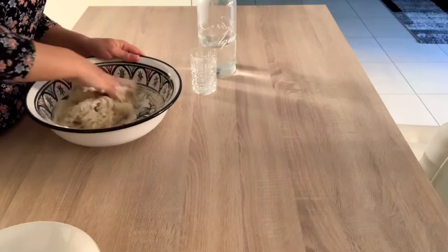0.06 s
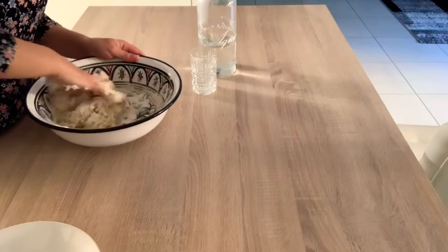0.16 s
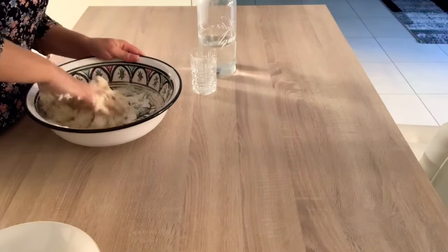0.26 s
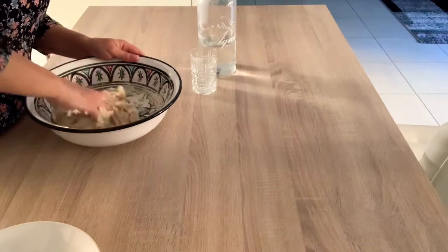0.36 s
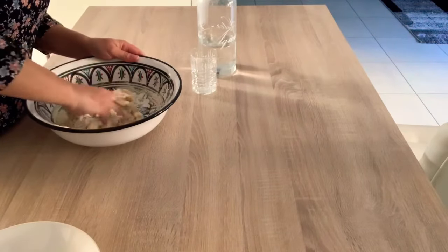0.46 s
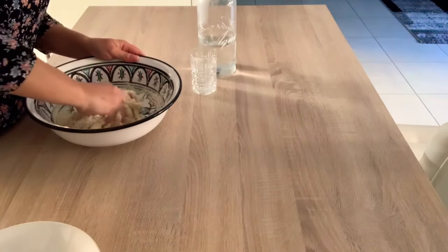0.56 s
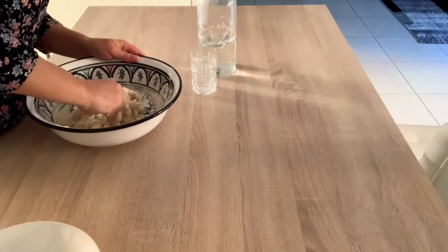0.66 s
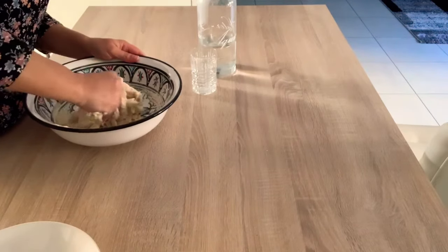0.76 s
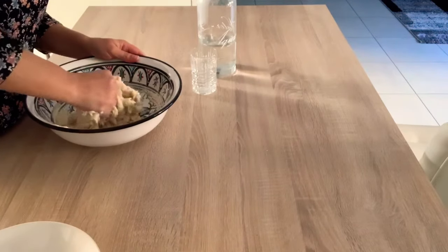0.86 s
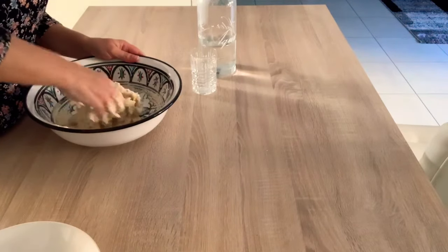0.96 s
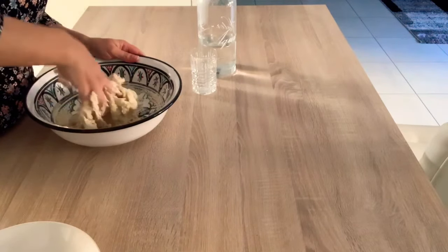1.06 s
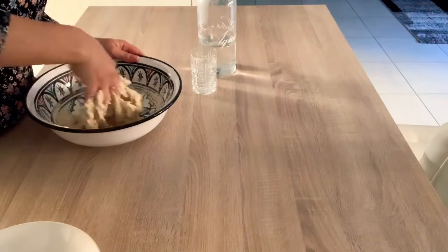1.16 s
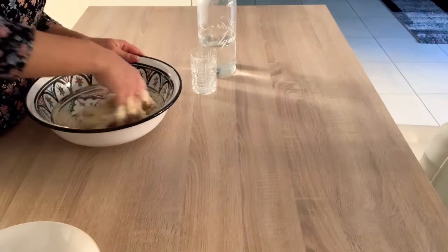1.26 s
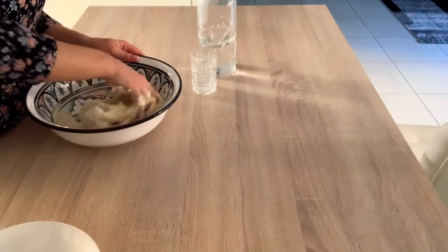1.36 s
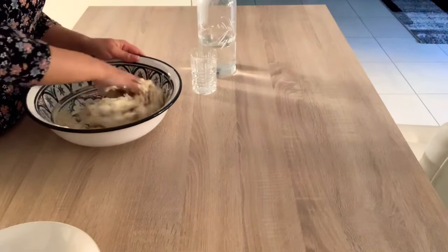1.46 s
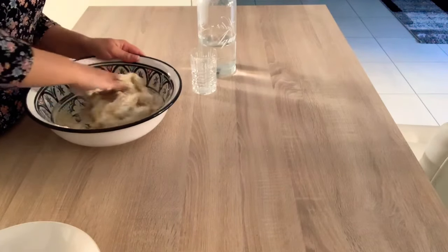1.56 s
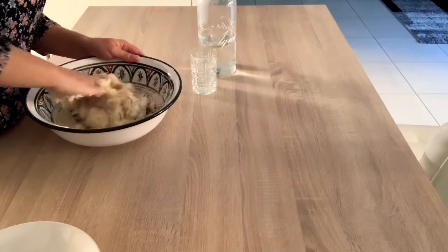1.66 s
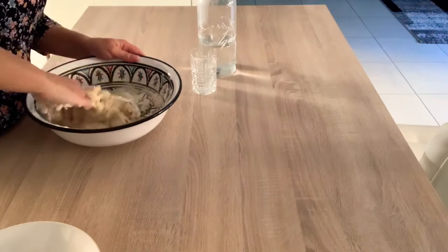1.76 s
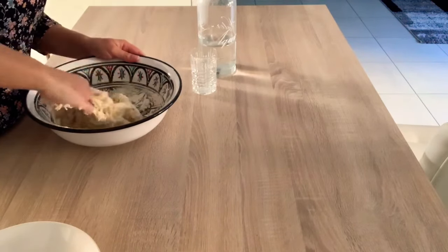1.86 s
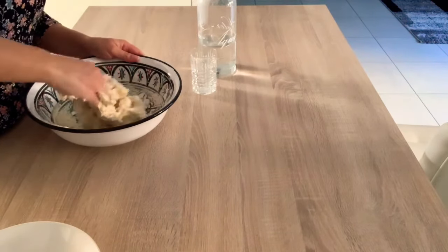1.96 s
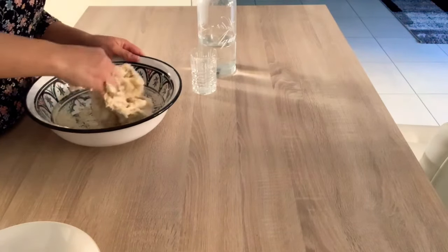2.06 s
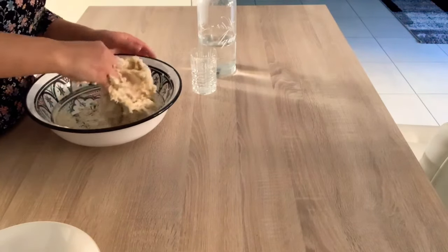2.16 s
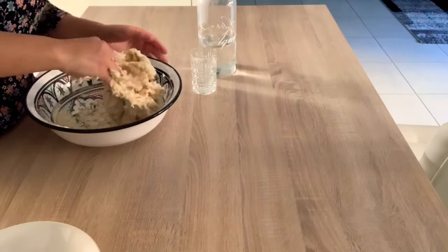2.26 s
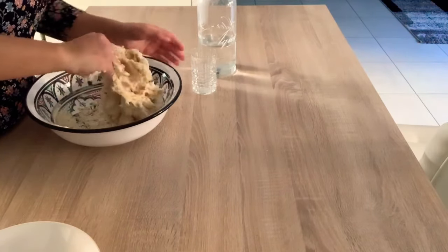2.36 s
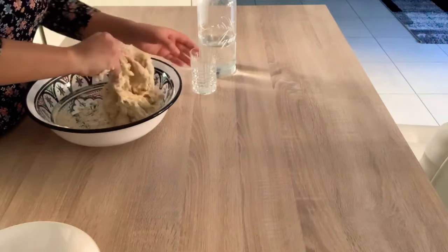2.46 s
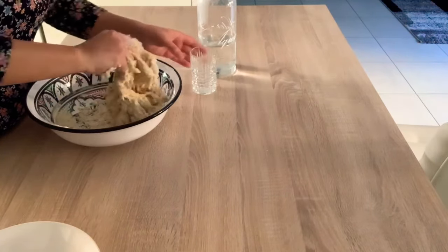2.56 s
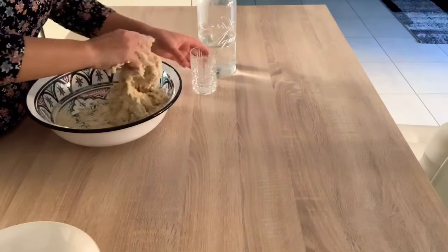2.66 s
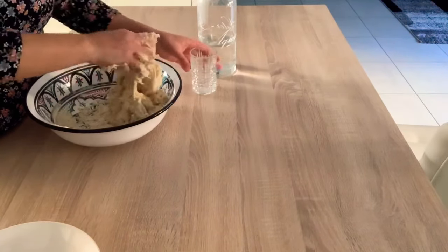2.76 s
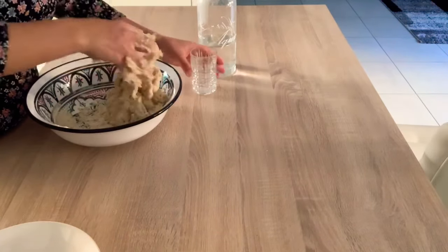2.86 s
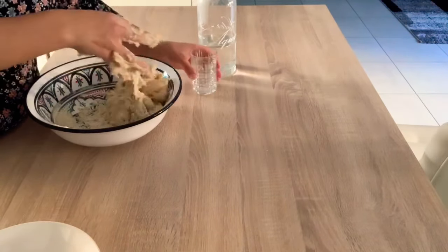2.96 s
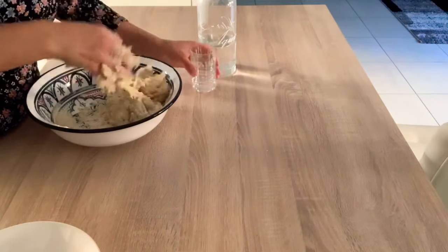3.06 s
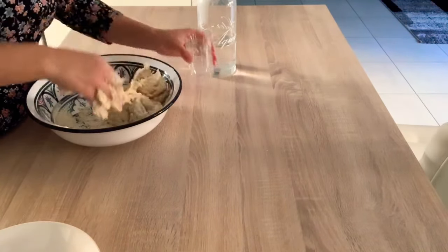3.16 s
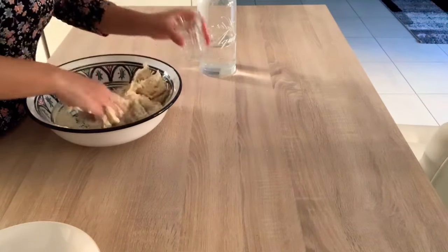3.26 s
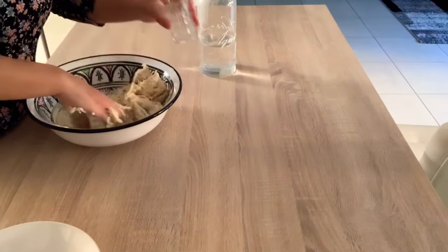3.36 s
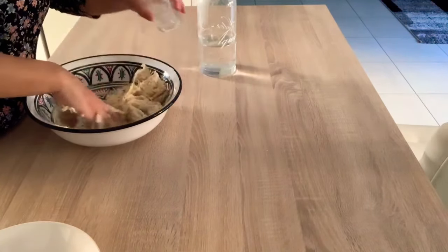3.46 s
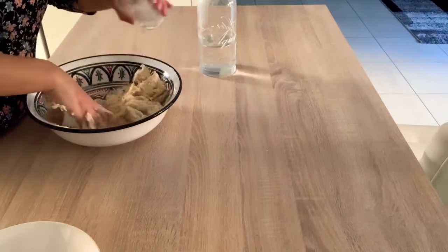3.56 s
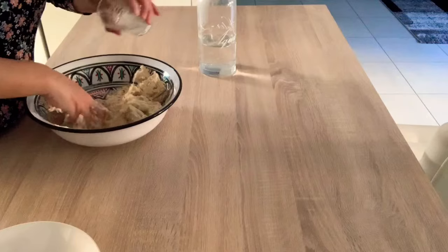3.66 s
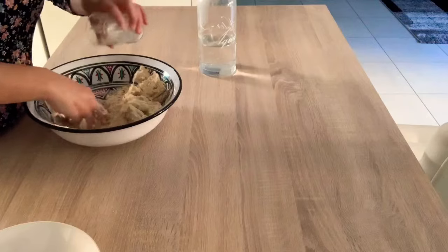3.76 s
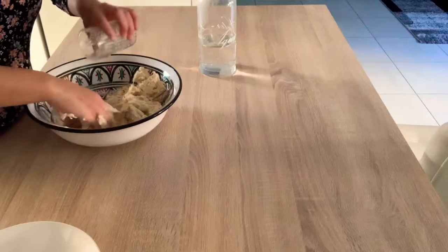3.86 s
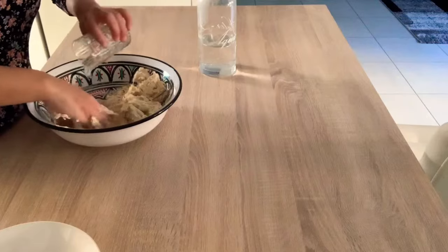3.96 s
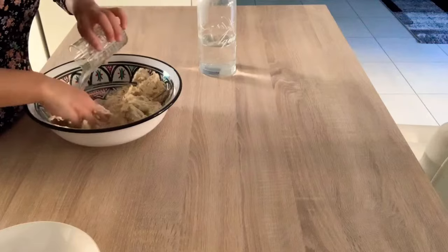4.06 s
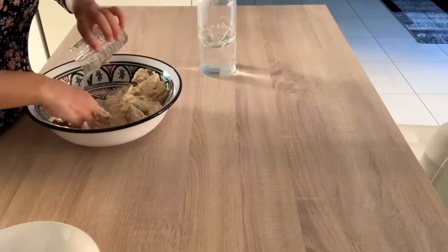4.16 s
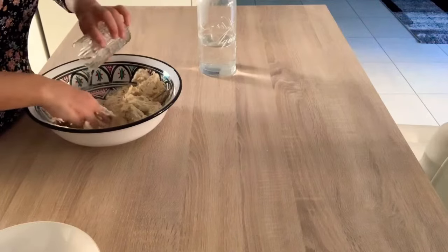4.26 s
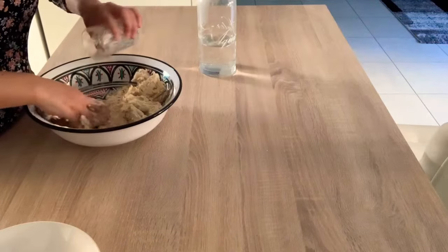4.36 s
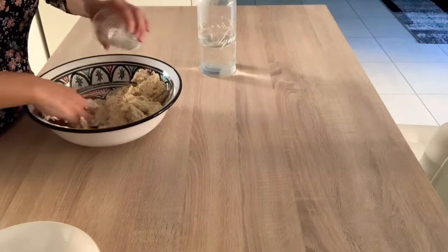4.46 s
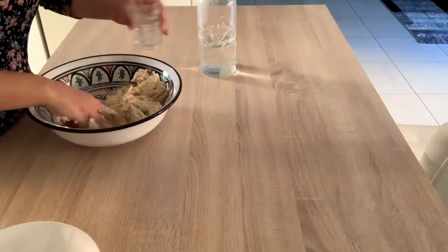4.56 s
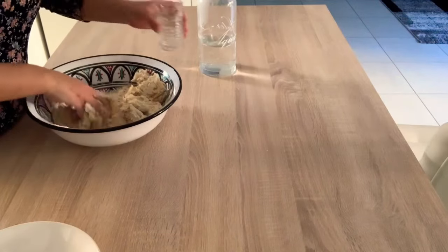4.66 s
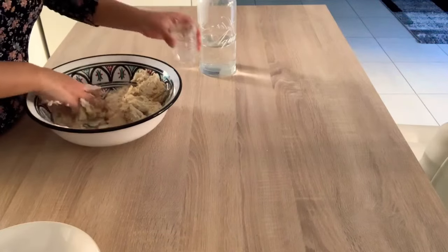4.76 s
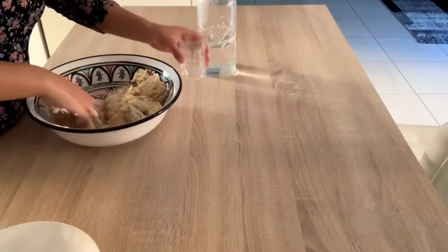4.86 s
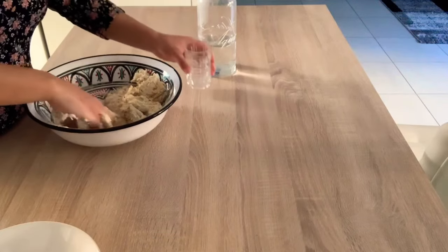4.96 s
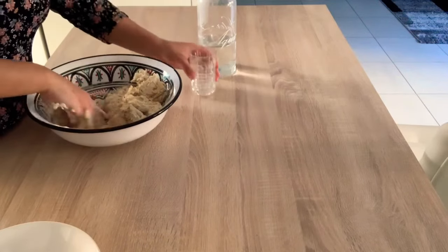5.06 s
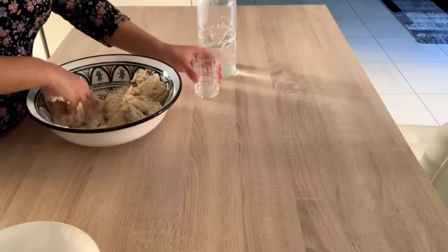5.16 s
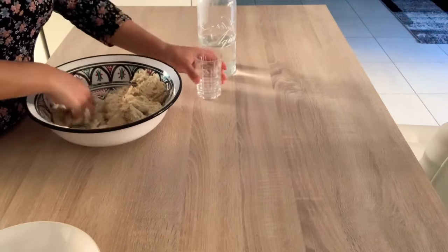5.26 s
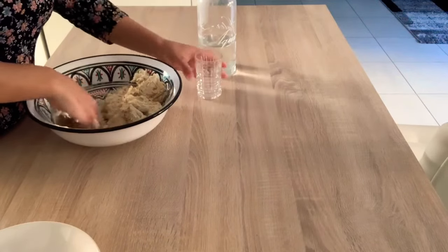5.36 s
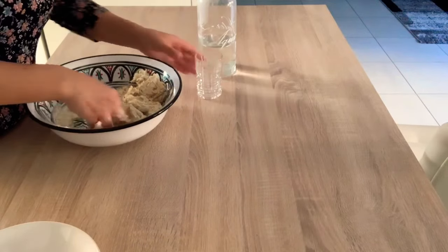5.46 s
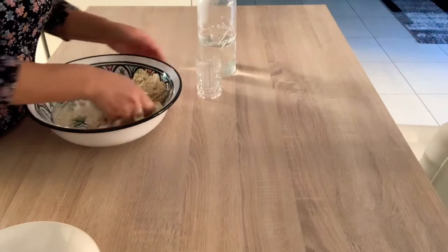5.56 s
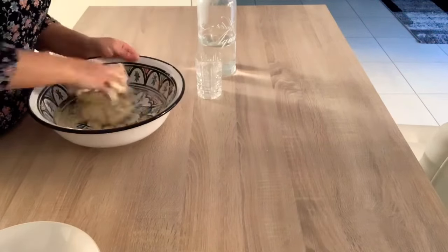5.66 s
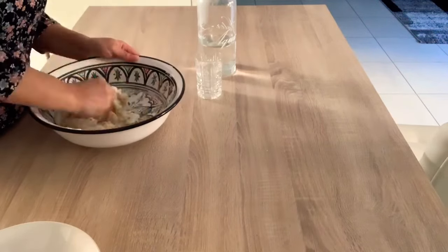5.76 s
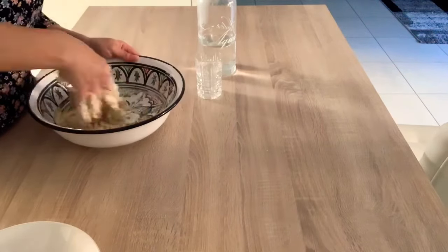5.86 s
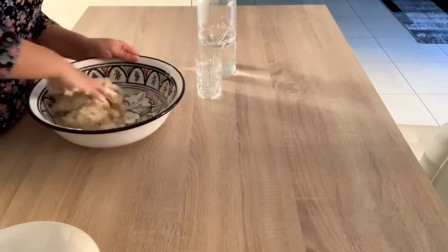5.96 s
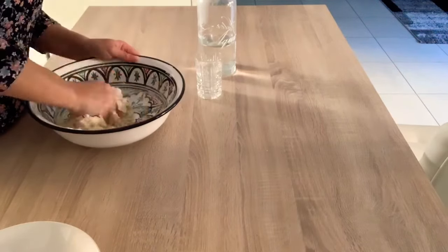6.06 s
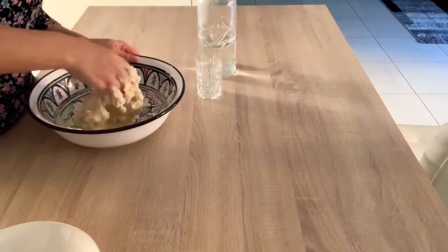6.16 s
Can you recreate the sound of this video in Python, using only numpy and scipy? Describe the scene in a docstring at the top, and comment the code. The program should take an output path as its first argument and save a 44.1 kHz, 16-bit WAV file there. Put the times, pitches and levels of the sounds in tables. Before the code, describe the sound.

In a quiet room, wet dough peels and crackles under a hand while pushes make the table boom dully. A bowl thump comes before one second, a softer one at three, beneath a barely audible bird twitter. After a tiny trickle of water, a glass knocks hard twice on wood. The bowl's foot slides and clatters lightly over a thinner background. The microphone is near the table.

```python
"""Wet dough squelches and fizzes in the air of a quiet room: it is kneaded by hand in a ceramic bowl on a table.
Pushes boom and rub as shaped noise; peeling is clustered snaps through resonances; pockets tick and ring.
The bowl thumps down twice and a glass gives two loud knocks, as decaying modes of the wooden table with a noise
wash. Wet skin squeaks and water trickles once as narrow noise; a bird twitters very faintly as gliding sines. At
last the bowl's foot slides and rattles, the background thins and faint held sines sound, perhaps the glass."""
import sys
import numpy as np
from scipy import signal
from scipy.fft import rfft, irfft, next_fast_len
from scipy.io import wavfile
from scipy.ndimage import uniform_filter1d, map_coordinates

SR = 44100
rng = np.random.default_rng(int(sys.argv[2]) if len(sys.argv) > 2 else 0)


def wav_record(signal):
    """Record a signal, one row per channel, as 16-bit PCM in the file named by sys.argv[1]."""
    frames = np.transpose(np.atleast_2d(signal))
    bounded = np.clip(frames, -1, 1)
    # unit amplitude maps onto the largest positive 16-bit level
    quanta = np.round(bounded * 32767).astype(np.int16)
    wavfile.write(sys.argv[1], SR, quanta)


N = 273420
TIME = np.arange(N) / SR
BAND_EDGES_HZ = np.geomspace(22, 17500, 30)


def from_db(db):
    """Level law: decibels to amplitude gain."""
    return 10 ** (np.asarray(db) / 20)


def rms_one(x):
    """Normalisation: scale to unit mean power."""
    return x / np.sqrt(np.mean(x ** 2) + 1e-20)


def at_hz(points, hz, axis=1):
    """Logarithmic pitch scale: read one column of a table along log frequency."""
    points = np.array(points, float)
    return np.interp(np.log(hz), np.log(points[:, 0]), points[:, axis])


def panned(x, left_db):
    """Level-difference stereo: tip the balance to the left."""
    return x * from_db(np.array([[left_db], [-left_db]]) / 2)


def add(out, s, sound):
    """Superposition: mix a sound in at a time."""
    start = int(s * SR)
    out[:, start:start + sound.shape[1]] += sound[:, :N - start]


def drift(rate):
    """Slow random modulation: smooth wavering of spread 1 through rate knots per second."""
    knots = rng.standard_normal(4096)
    return map_coordinates(knots, [TIME * rate], order=2, mode="wrap")


# likeness of the two channels: hz, correlation (-1 to 1)
LIKENESS = [(60, 0.99), (150, 0.8), (300, 0.42), (640, -0.44), (1400, 0.029), (3000, 0.1), (7000, -0.39),
            (10000, -0.93), (12000, 0.63), (14000, 0.92)]


def likeness(hz):
    """Interchannel coherence: correlation of left and right at a frequency."""
    return np.clip(at_hz(LIKENESS, hz), -.99, .99)


def noise_bands(size):
    """Band analysis: third-octave stereo noise with the tabulated correlation in each band."""
    run_in = SR // 4
    white = rng.standard_normal((2, 2, size + run_in))
    centres_hz = np.sqrt(BAND_EDGES_HZ[1:] * BAND_EDGES_HZ[:-1])
    for k, hz in enumerate(centres_hz):
        band = signal.butter(2, BAND_EDGES_HZ[k:k + 2], "band", fs=SR, output="sos")
        mid, side = signal.sosfilt(band, white[k % 2])[:, run_in:]
        alike = likeness(hz)
        yield hz, np.sqrt(1 + alike) * mid + np.sqrt(1 - alike) * side * [[1], [-1]]


def coloured(pair, spectrum):
    """Spectral shaping: two unrelated signals become stereo with the given spectrum; rms 1."""
    length = pair.shape[1]
    size = next_fast_len(length)
    hz = np.maximum(np.fft.rfftfreq(size, 1 / SR), 1)
    alike = likeness(hz)
    beyond = 1 / (1 + (hz / (2 * spectrum[-1][0])) ** 2)   # fall above the last tabulated frequency
    gain = from_db(at_hz(spectrum, hz)) * beyond * np.sqrt([1 + alike, 1 - alike])
    mid, side = irfft(rfft(pair, size) * gain, size)[:, :length]
    return rms_one(np.array([mid + side, mid - side]))


def noise(spectrum):
    """Stationary random sound: steady stereo noise."""
    return coloured(rng.standard_normal((2, N)), spectrum)


def evened(x, span_s):
    """Envelope flattening: take out slow swells, so that the hand alone shapes the sound."""
    power = uniform_filter1d(np.mean(x ** 2, axis=0), int(span_s * SR))
    return x / np.sqrt(power + 1e-9)


def swells(events, rise, roundness):
    """Amplitude envelope: gain rises to a peak and dies away, halved at the ends of its length.

    rise is the share of the length spent rising; roundness runs from 1 (pointed) to 2 (bell-shaped).
    Overlapping movements add in power; there is one curve per level column."""
    power = 0
    for peak_s, length_s, *levels_db in events:
        away = np.maximum((peak_s - TIME) / rise, (TIME - peak_s) / (1 - rise)) / length_s
        bump = .5 ** np.minimum(away ** roundness, 20)
        power = power + np.outer(from_db(levels_db), bump) ** 2
    return np.sqrt(power)


def with_fingers(gain, fingers_db):
    """Power addition: the restless fingers waver in level beneath the larger movements."""
    waver_db = 2.5 * drift(18)
    return np.hypot(gain, from_db(fingers_db + waver_db))


def crackle(spectrum, per_s, spread_db, clump_db, wet_db, patchy_db):
    """Random impulses and resonance: clumped snaps ring in hollows that open and close; the room smears them."""
    chance = per_s * from_db(clump_db * drift(60)) / SR
    born = rng.random((2, N)) < chance
    sizes = from_db(spread_db * np.minimum(rng.exponential(1, (2, N)), 4))
    snaps = born * rng.choice([-1, 1], (2, N)) * sizes
    echo = rng.standard_normal((2, SR // 3)) * from_db(-60 * TIME[:SR // 3] / 0.1)
    smeared = signal.fftconvolve(snaps, echo, axes=1)[:, :N]
    grains = rms_one(snaps) + from_db(wet_db) * rms_one(smeared)
    hollows = 0
    for k, hz in enumerate(np.geomspace(400, 19500, 30)):
        opening = (-1) ** k * from_db(patchy_db * drift(22))
        hollows = hollows + opening * signal.lfilter(*signal.iirpeak(hz, 11, fs=SR), grains)
    return evened(coloured(hollows, spectrum), span_s=0.13)


# spectrum of the quiet room's air: hz, density_db per Hz (relative)
AIR = [(15, -28.5), (25, -16), (65, 2), (130, -5.5), (300, -16), (700, -16), (1300, -30), (3000, -33),
       (6000, -38), (15000, -51.5)]


def quiet_air():
    """Stationary noise: the steady, deep background."""
    return panned(from_db(-61) * noise(AIR), left_db=0.5)


# wet dough peels from fingers and glaze: peak_s, length_s, squelch_db, fizz_db
PEELS = [(0.01, .11, -60, -77), (0.15, 0.085, -62.5, -74), (0.23, 0.045, -76, -65.5),
         (0.33, 0.15, -67, -78), (0.52, 0.13, -67, -75), (1.0, 0.058, -57.5, -61.5),
         (1.04, 0.059, -67, -59.5), (1.53, 0.14, -59, -73.5), (1.81, 0.1, -72.5, -77),
         (2.14, 0.12, -76, -78.5), (2.67, 0.13, -71, -87), (3.02, 0.25, -77, -97),
         (3.49, 0.098, -67, -72.5), (3.92, 0.043, -72.5, -82), (4.16, 0.036, -69.5, -74),
         (4.3, 0.051, -63, -83), (4.38, 0.13, -64, -75), (4.55, 0.086, -67, -82), (4.74, 0.11, -60, -72.5),
         (4.9, 0.1, -62, -74), (4.97, 0.054, -61, -83), (5.09, 0.22, -63.5, -81), (5.23, 0.032, -69, -70),
         (5.36, .07, -58.5, -58.5), (5.785, 0.013, -71, -65.5), (5.88, .03, -72.5, -73),
         (5.93, 0.082, -72, -83), (6.02, .07, -75, -68)]
# spectra of the squelch and of the fine fizz: hz, density_db per Hz (relative)
SQUELCH = [(500, -18), (1100, -7), (1900, -7), (2500, 0), (3600, 0), (4400, -3), (5600, -1), (7200, -7),
           (10000, -19), (15000, -36)]
FIZZ = [(3000, -40), (8000, -16), (11000, -1), (14000, 0), (15500, -3), (17000, -20)]


def sticky_dough():
    """Granular emission: wet dough squelches and fizzes in countless snaps as it peels away."""
    tearing, fizzing = swells(PEELS, rise=0.47, roundness=1.65)
    wet_snaps = crackle(SQUELCH, per_s=3000, spread_db=2.5, clump_db=4.0, wet_db=-5.5, patchy_db=2.0)
    fine_snaps = crackle(FIZZ, per_s=2800, spread_db=4.5, clump_db=4.5, wet_db=3.0, patchy_db=1.5)
    squelch = with_fingers(tearing, fingers_db=-85) * wet_snaps
    fizz = with_fingers(fizzing, fingers_db=-82) * fine_snaps
    return panned(squelch + fizz, left_db=-0.2)


# air pockets bursting in the dough: start_s, level_db, pitch_hz
POPS = [(0.048, -59, 2740), (0.221, -54, 12700), (0.549, -61.5, 6100), (0.637, -60.5, 13400),
        (1.031, -55.5, 13600), (3.525, -48, 3360), (4.299, -57.5, 5060), (4.418, -60.5, 4200),
        (4.875, -47, 3660), (5.218, -54, 14000), (5.241, -58, 13800), (5.334, -45.5, 12800),
        (5.438, -54, 3520)]
# spectrum of the tick: hz, density_db per Hz (relative)
POP = [(500, -11), (1800, 2.5), (3200, -17), (5000, 2.5), (9000, -0.5), (15000, -5.5)]


def air_pockets(snap_s, tail_db, tail_s, ring_db, ring_s):
    """Cavity resonance: a bursting pocket gives a sharp tick, a brief ring and a faint, duller tail."""
    out, t = np.zeros((2, N)), TIME[:SR // 4]
    for start_s, level_db, pitch_hz in POPS:
        tick = np.exp(-t / snap_s) * coloured(rng.standard_normal((2, len(t))), POP)
        tail_noise = coloured(rng.standard_normal((2, len(t))), SQUELCH)
        tail = from_db(tail_db) * np.exp(-t / tail_s) * tail_noise
        ring = from_db(ring_db) * np.exp(-t / ring_s) * np.sin(2 * np.pi * pitch_hz * t)
        add(out, start_s, from_db(level_db) * (tick + ring + tail))
    return out


# the lump of dough shifts in the bowl: peak_s, length_s, thud_db, rub_db
SHOVES = [(0.085, 0.054, -55, -59.5), (0.5, 0.063, -45.5, -56.5), (0.785, 0.087, -49, -54),
          (2.2, 0.15, -54, -65), (2.96, 0.027, -54.5, -53.5), (3.01, 0.035, -56, -50),
          (3.2, 0.1, -56.5, -60.5), (3.46, 0.091, -55.5, -50.5), (3.65, .14, -57, -71),
          (4.57, 0.28, -60, -65), (4.78, 0.19, -54, -63.5), (5.06, 0.36, -60, -64)]
# the arm leans on the bowl and the table booms: peak_s, length_s, level_db
PUSHES = [(0.23, 0.22, -48), (0.53, 0.12, -47), (1.06, 0.33, -47.5), (1.38, 0.4, -55.5),
          (1.59, 0.066, -47.5), (1.88, 0.21, -45.5), (2.18, 0.11, -45), (2.28, 0.12, -52.5),
          (2.46, 0.089, -55), (2.74, 0.21, -54.5), (3.07, 0.19, -53.5), (3.27, 0.12, -45.5),
          (3.47, 0.21, -50.5), (3.99, 0.26, -50), (4.29, 0.12, -46), (4.41, .07, -49.5), (4.6, 0.16, -53),
          (4.85, 0.25, -51.5), (5.15, 0.12, -47.5), (5.46, .06, -53.5)]
# spectra of the table's boom, the dough's thud and its rubbing: hz, density_db per Hz (relative)
BOOM = [(15, -50), (25, -33.5), (45, -8.5), (57, -11), (69, 11.5), (85, -10.5), (120, -38), (250, -67.5)]
THUD = [(60, -5.5), (100, -6.5), (130, 7), (190, -2.5), (270, -19.5), (600, -55.5)]
RUB = [(130, -14.5), (230, 0), (340, 6.5), (500, -6.5), (750, -10.5), (1200, -34.5), (2200, -30.5),
       (5000, -65.5)]


def pushing():
    """Forced vibration and friction: pushes make the table boom while the dough thuds and rubs in the bowl."""
    lean, = swells(PUSHES, rise=0.49, roundness=1.7)
    weight, friction = swells(SHOVES, rise=0.38, roundness=1.7)
    # every push also thuds and rubs, at these levels relative to its boom
    weight = np.hypot(weight, lean * from_db(-18.5))
    friction = np.hypot(friction, lean * from_db(-22))
    boom = lean * evened(noise(BOOM), span_s=0.13)
    thud = with_fingers(weight, fingers_db=-61) * evened(noise(THUD), span_s=0.027)
    rub = with_fingers(friction, fingers_db=-67.5) * evened(noise(RUB), span_s=0.046)
    return panned(boom + thud + rub, left_db=3.5)


def strike(blow, modes, wash, wash_db, crack_db, crack_s, build_cycles, travel_s, scatter_db, skew, steepness):
    """Modal impact: modes swell and ring, a short crack leads, and a dense wash follows."""
    _, level_db, bass_db, middle_db, tilt_db, contact_hz, ring, left_db = blow
    t = TIME[:SR * 3 // 4]

    def drive(hz):
        """Excitation spectrum: strength and age of the motion at one pitch."""
        weight_db = bass_db / (1 + (hz / 240) ** 4)
        # the spot that is hit favours or starves the middle modes
        spot_db = middle_db * np.exp(-np.log2(hz / 1000) ** 2)
        tilt = from_db(tilt_db * np.log2(max(hz / 400, 1)))
        hardness = tilt / np.sqrt(1 + (hz / contact_hz) ** steepness)
        # low bending waves cross the board more slowly
        age = np.maximum(t - travel_s / (1 + (hz / 700) ** 2), 0)
        build_up = 1 - np.exp(-age * hz / build_cycles)
        return from_db(level_db + weight_db + spot_db) * hardness * build_up, age

    body, tail = 0, 0
    for k, (hz, mode_db, t60, side_db) in enumerate(modes):
        force, age = drive(hz)
        # the less alike the channels are at this pitch, the further apart their phases
        phase_gap = np.arccos(np.clip(at_hz(LIKENESS, hz), -1, 1))
        apart = skew * (-1) ** (k // 2) * phase_gap * np.array([[.5], [-.5]])
        wave = np.sin(2 * np.pi * hz * age + apart + rng.uniform(0, 2 * np.pi))
        decay_db = mode_db + rng.normal(0, scatter_db) - 60 * age / (t60 * ring)
        body = body + panned(force * from_db(decay_db) * wave, side_db)
    for hz, band in noise_bands(len(t)):
        force, age = drive(hz)
        decay = from_db(-60 * age / (at_hz(wash, hz, axis=2) * ring))
        crack = from_db(crack_db) * np.exp(-age / crack_s) * hz / (hz + 1200)
        tail = tail + band * force * from_db(at_hz(wash, hz) + wash_db) * (decay + crack)
    return panned(body + tail, left_db)


# blows on the table top: start_s, level_db, bass_db, middle_db, treble_tilt_db per octave,
# contact_cutoff_hz, ring_factor (multiplies every t60_s), left_right_db
BLOWS = [(0.831, -25, 9.5, -12.5, -1.5, 2800, 0.82, 0.5), (3.032, -32.5, -8.5, 3, -17, 980, 0.88, 4.5),
         (5.137, -18, 3.5, 4, 0.5, 12000, 1, 1), (5.288, -13.5, -6.5, -1.5, 0.0, 12100, 0.96, 2.0)]
# modes of the table top with the bowl on it: pitch_hz, level_db, t60_s (at ring factor 1), left_right_db
TABLE_MODES = [(72.3, -28.5, 0.45, 8), (101.8, -10.5, 0.27, 5), (125.3, -7, 0.44, 0),
               (140.7, -11.5, 0.36, 5), (179.4, -9.5, .35, -7), (253, -4, 0.28, -0.5),
               (285.5, -5.5, 0.26, 4.5), (305, -7, .22, -9.5), (351.2, 2.5, 0.4, 7), (396, -2, 0.32, 9),
               (411.4, 0, 0.26, -8.5), (451.5, -10, 0.43, -4.5), (447, -5.5, 0.15, -2.5),
               (508, -7.5, 0.29, -9), (565, -11.5, 0.22, -8), (611, -20, 0.45, 5), (658, -3.5, 0.27, 0),
               (742, 0.5, 0.21, -6.5), (773, -10.5, 0.11, -13.5), (835, -10, 0.18, 11),
               (912, -7.5, 0.11, 10.5), (992, -23, 0.46, 15.5), (1119, -25.5, 0.36, 14),
               (1194, -19, 0.36, -4.5), (1407, -20.5, 0.26, 5), (1520, -33, 0.33, -3.5),
               (1756, -14.5, 0.11, -6.5), (2140, -36, .2, -6.5), (2970, -40.5, .16, -12.5)]
# the dense wash that follows a blow: hz, density_db per Hz (relative), t60_s (at ring factor 1)
TABLE_WASH = [(40, -13, 0.63), (110, -3, 0.58), (214, -11.5, 0.72), (406, 1, 0.53), (573, -10.5, 0.83),
              (800, -6, 0.61), (1470, -21, 0.36), (2520, -29, 0.33), (4770, -42, 0.46), (8700, -49, 0.41),
              (15000, -57, 0.59)]


def table_knocks():
    """Plate vibration: the bowl, then the glass, excites the modes of the table top."""
    out = np.zeros((2, N))
    for blow in BLOWS:
        knock = strike(blow, TABLE_MODES, TABLE_WASH, wash_db=10.5, crack_db=9, crack_s=0.0061,
                       build_cycles=0.96, travel_s=0.003, scatter_db=1.0, skew=0.58, steepness=11)
        add(out, blow[0], knock)
    return out


# faint short rough tones: wet skin squeaks, and water trickles from the glass at 4.27 s:
# centre_s, pitch_hz, length_s, level_db
ROUGH_TONES = [(0.958, 5500, 0.045, -67), (1.002, 2480, 0.065, -59.5), (2.087, 4300, 0.089, -75),
               (2.087, 2370, 0.097, -73), (2.158, 4300, 0.046, -70), (2.161, 3360, 0.077, -73),
               (2.188, 1540, 0.11, -72.5), (2.612, 4530, 0.089, -74), (3.461, 3360, .08, -65),
               (3.47, 4300, 0.072, -75), (4.27, 5600, 0.07, -64.5), (4.546, 3600, 0.14, -69)]


def squeaks_and_trickle(width_hz):
    """Narrow-band noise: short rough tones for squeaking wet skin and one trickle of water."""
    out = np.zeros((2, N))
    for centre_s, pitch_hz, length_s, level_db in ROUGH_TONES:
        size = int(length_s * SR)
        edges_hz = [pitch_hz - width_hz / 2, pitch_hz + width_hz / 2]
        band = signal.butter(2, edges_hz, "band", fs=SR, output="sos")
        tone = rms_one(signal.sosfilt(band, rng.standard_normal((2, SR // 4)))[:, -size:])
        add(out, centre_s - length_s / 2, from_db(level_db) * np.hanning(size) * tone)
    return out


def add_note(out, centre_s, pitch_hz, length_s, level_db, fall):
    """Frequency modulation: a sine swells, fades and falls by a share of its pitch."""
    t = TIME[:int(length_s * SR)]
    glide_hz = pitch_hz * (1 + fall * (.5 - t / length_s))
    note = np.hanning(len(t)) * np.sin(2 * np.pi * np.cumsum(glide_hz) / SR)
    add(out, centre_s - length_s / 2, from_db(level_db) * np.array([note, note]))


def echoed(x, echo_db):
    """Reverberation: convolution with decaying noise blurs a sound."""
    echo = rng.standard_normal((2, SR // 3)) * from_db(-60 * TIME[:SR // 3] / 0.25)
    blurred = signal.fftconvolve(x, echo / np.linalg.norm(echo[0]), axes=1)[:, :N]
    return x + from_db(echo_db) * blurred


# a far bird's quick series of chirps: centre_s, pitch_hz, level_db
CHIRPS = [(2.68, 4780, -68), (2.777, 4910, -74), (2.83, 4880, -77), (2.895, 4860, -71), (2.948, 4890, -66),
          (3.01, 4930, -67), (3.064, 4980, -68), (3.13, 4850, -68.5)]


def bird(echo_db):
    """Frequency modulation and reverberation: short falling chirps, blurred by distance."""
    out = np.zeros((2, N))
    for centre_s, pitch_hz, level_db in CHIRPS:
        fall = .13 * (1 + 0.44 * rng.standard_normal())   # share of its pitch
        add_note(out, centre_s, pitch_hz, 0.024, level_db, fall)
    return echoed(out, echo_db)


# the bowl slides before it taps, as points of a level curve: time_s, level_db
SLIDE = [(5.50, -51), (5.515, -56), (5.548, -57.5), (5.558, -44), (5.585, -37), (5.60, -66), (5.64, -90)]
# spectrum of the sliding: hz, density_db per Hz (relative)
SCRAPE = [(50, -60), (120, -32), (300, -13), (520, -0.5), (900, 0), (1450, -1.5), (2200, -13), (3400, -18),
          (5000, -28), (8000, -21.5), (15000, -26)]
# the bowl's foot taps the table: start_s, level_db, bass_db, middle_db, treble_tilt_db per octave,
# contact_cutoff_hz, ring_factor (multiplies every t60_s), left_right_db
RATTLES = [(5.511, -62.5, -1, 0, 8, 5030, 0.43, 2), (5.588, -26.5, 0, 0, 1, 8050, 0.9, 1.2),
           (5.655, -31.5, 2.5, 1, -2, 3970, 0.7, 2.5), (5.872, -39, 14.5, 0.21, -8, 2200, 1.03, 2.2),
           (6.016, -39.5, 7, 0.35, -4, 2280, 0.82, 3.2), (6.096, -40, -7, 0.1, -5, 2180, 0.68, 3),
           (6.145, -35, -15, 0.27, -5, 2050, 0.66, 3.5)]
# modes of the bowl held by its rim: pitch_hz, level_db, t60_s (at ring factor 1), left_right_db
BOWL_MODES = [(281, -15.5, 0.135, 0), (389, -11.5, 0.16, -1.5), (505.6, 3, 0.1, 0),
              (590, -12.5, 0.071, 1.5), (760, -9, 0.087, 4.5), (1153, 5, 0.015, 7.5),
              (1407, 1.5, 0.051, 3.5), (1604, 2, 0.022, -8), (1660, -2.5, 0.016, -2.5),
              (2030, -32, 0.041, 1), (2700, -25, 0.11, -15), (3420, -13.5, 0.02, 2)]
# the wash that follows a tap: hz, density_db per Hz (relative), t60_s (at ring factor 1)
BOWL_WASH = [(50.2, -59, .2), (112.7, -36, .2), (246, -7.5, 0.36), (520, -2.5, 0.35), (900, 2, 0.12),
             (1455, 3.5, 0.14), (2360, -15.5, 0.1), (3430, -28, 0.18), (5440, -44, 0.18),
             (15000, -20.5, 0.44)]


def bowl_rattle():
    """Damped modes: the bowl's foot slides and taps, damped by the hand on the rim, without deep bass."""
    slide_s, slide_db = np.transpose(SLIDE)
    scrape = crackle(SCRAPE, per_s=1600, spread_db=1.5, clump_db=2.0, wet_db=-5.0, patchy_db=0.0)
    slide = from_db(np.interp(TIME, slide_s, slide_db)) * scrape
    out = panned(slide, left_db=2.0) * (TIME > slide_s[0]) * (TIME < slide_s[-1])
    for blow in RATTLES:
        tap = strike(blow, BOWL_MODES, BOWL_WASH, wash_db=4.5, crack_db=13, crack_s=0.0008,
                     build_cycles=1.0, travel_s=0.00387, scatter_db=3.0, skew=0.11, steepness=8.8)
        add(out, blow[0], tap)
    low_cut = signal.butter(2, 160, "high", fs=SR, output="sos")
    return signal.sosfilt(low_cut, out)


# spectrum of the thinner background: hz, density_db per Hz (relative)
THIN_AIR = [(60, -38), (115, -19.5), (210, 5), (350, -5.5), (700, -7), (1400, -14), (2700, -26),
            (5000, -34.5), (15000, -31)]


def thin_air():
    """Stationary noise: the background that is left when the deep sounds stop."""
    return panned(from_db(-61.0) * noise(THIN_AIR), left_db=3.0)


# thin held notes, perhaps the glass ringing faintly: centre_s, pitch_hz, length_s, level_db
HELD_NOTES = [(5.84, 4660, 0.041, -73), (5.982, 5620, 0.037, -73), (5.986, 4660, 0.1, -85)]


def held_notes(echo_db):
    """Pure tones and reverberation: thin notes of steady pitch, perhaps the glass ringing faintly."""
    out = np.zeros((2, N))
    for held_note in HELD_NOTES:
        add_note(out, *held_note, fall=0)
    return echoed(out, echo_db)


def scene():
    """Superposition: all sources add; the deep ones stop abruptly and leave a thinner background."""
    bass_ends_s, fade_s = 5.515, .008
    deep = np.clip((bass_ends_s - TIME) / fade_s + .5, 0, 1)
    pockets = air_pockets(snap_s=0.003, tail_db=-10.0, tail_s=0.04, ring_db=6, ring_s=0.0014)
    wet_sounds = sticky_dough() + pockets + squeaks_and_trickle(width_hz=120)
    background = deep * (table_knocks() + pushing() + quiet_air()) + (1 - deep) * thin_air()
    return background + wet_sounds + bowl_rattle() + bird(echo_db=2.5) + held_notes(echo_db=2.5)


def record(dry):
    """Saturation and low-pass filtering: the highest peaks are rounded and the top is cut."""
    rounded = 1.3 * np.tanh(dry / 1.3)
    top_cut = signal.ellip(10, .2, 80, 15900, fs=SR, output="sos")   # cut-off in Hz
    return signal.sosfilt(top_cut, rounded)


dry = scene()
out = record(dry)
wav_record(out)
```